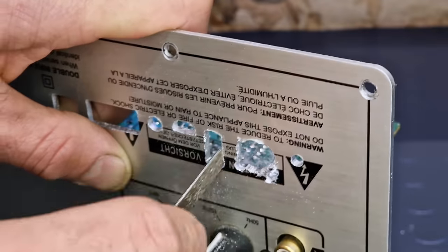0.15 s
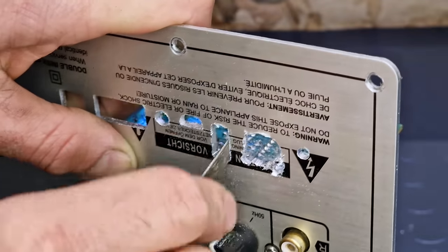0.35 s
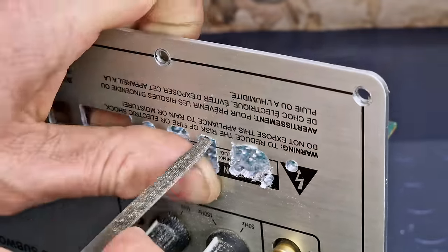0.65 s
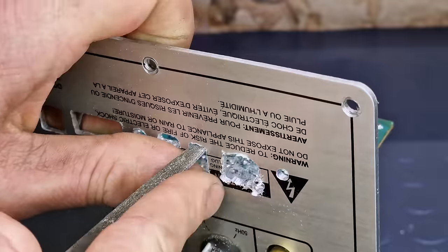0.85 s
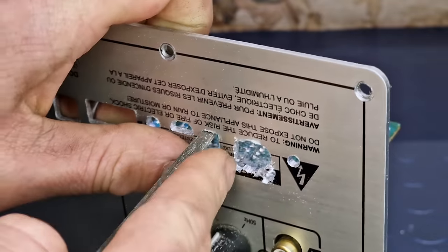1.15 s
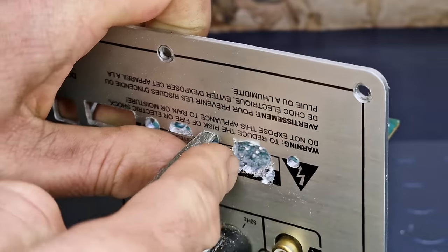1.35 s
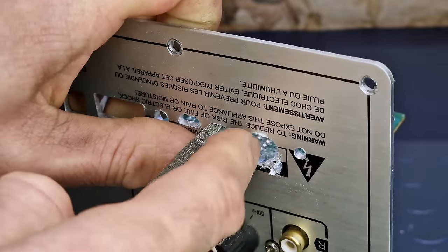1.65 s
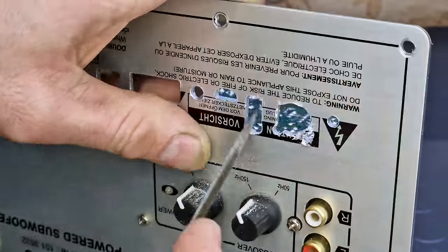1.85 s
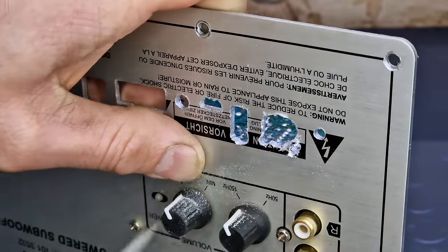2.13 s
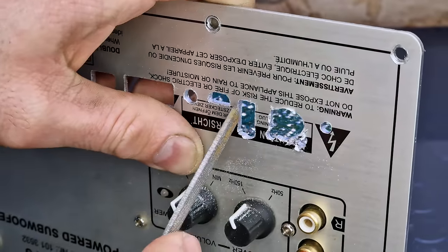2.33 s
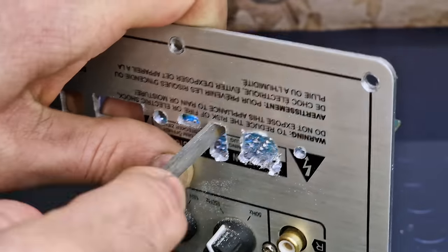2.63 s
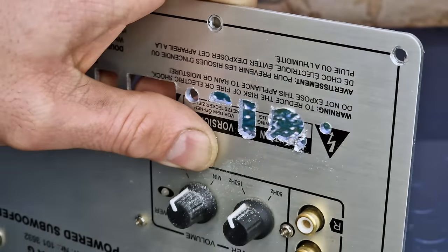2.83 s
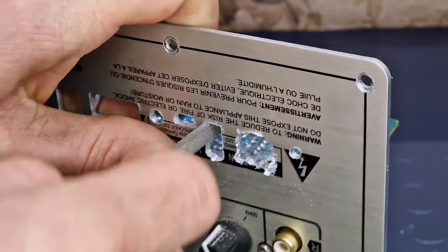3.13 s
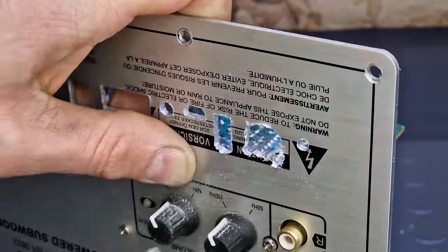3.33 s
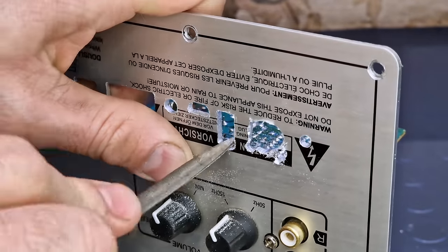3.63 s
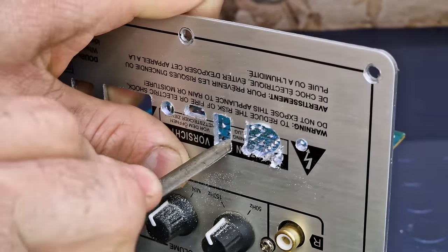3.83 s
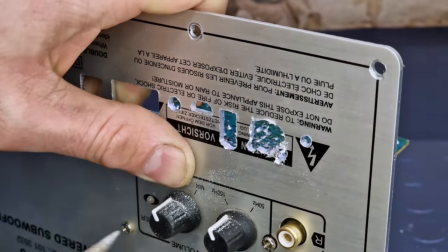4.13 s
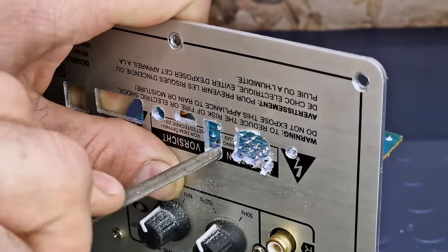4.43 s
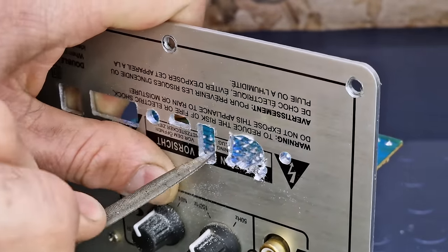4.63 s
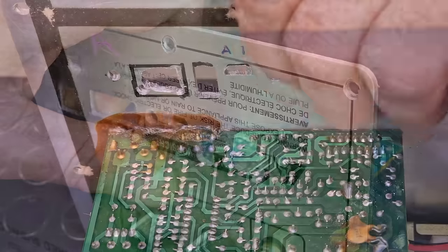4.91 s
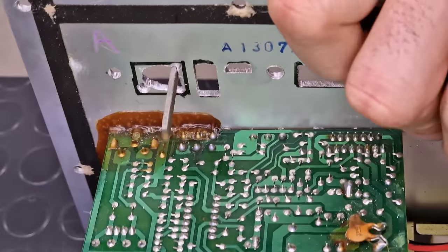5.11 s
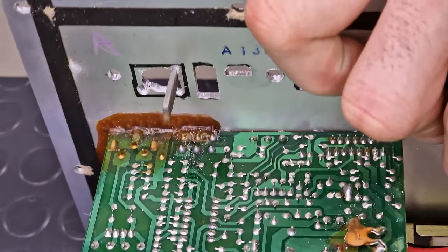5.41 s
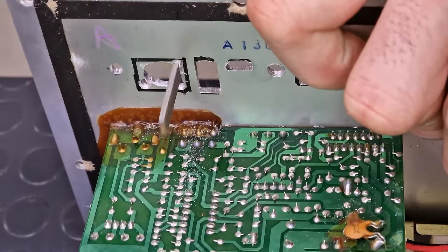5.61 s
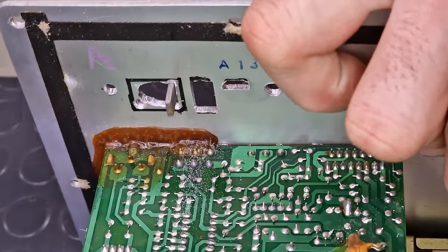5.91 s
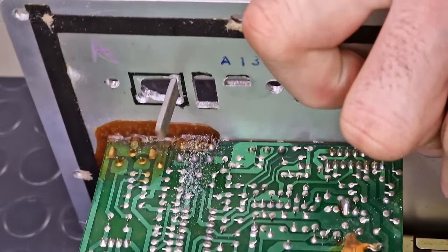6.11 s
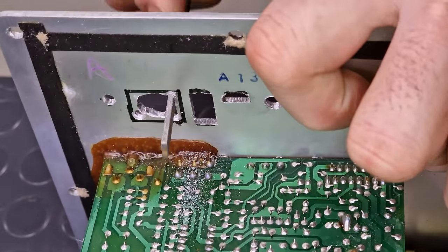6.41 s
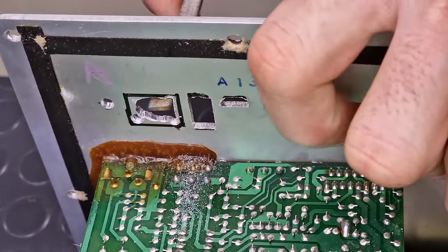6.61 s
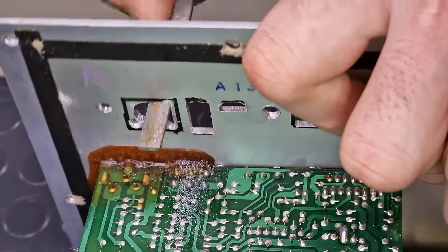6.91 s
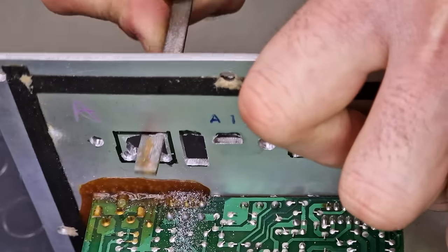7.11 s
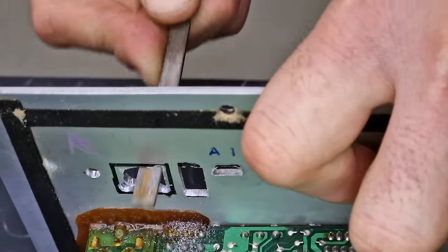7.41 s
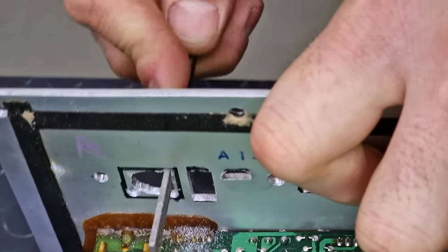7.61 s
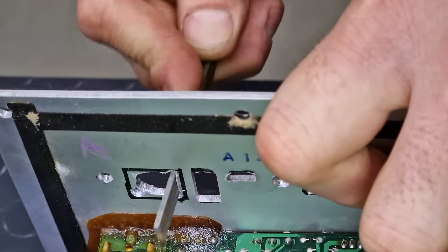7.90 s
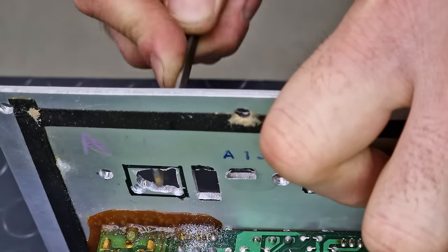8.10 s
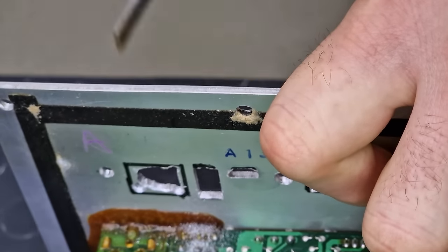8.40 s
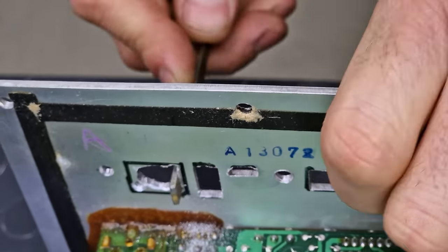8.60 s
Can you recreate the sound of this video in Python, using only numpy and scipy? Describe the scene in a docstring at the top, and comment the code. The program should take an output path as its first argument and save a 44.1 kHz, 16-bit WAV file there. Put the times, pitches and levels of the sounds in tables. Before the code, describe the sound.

A flat steel blade files a slot in an aluminium plate in short chattering strokes, with ticks, squeaks and later knocks, in a small workshop.

```python
"""A chattering rasp opens: a flat steel blade, cut like a file, works a slot in a hand-held aluminium plate.
In long strokes it bites about 30-80 times a second; tiny fractures hiss at the edge and ring the plate.
Between strokes it slides, scuffs and ticks. Now and then the edge squeaks or a hard push flexes the panel.
From 5 s it is heard from the back, where the panel rings louder and the blade knocks in the slot.
A small workshop adds short reflections and faint steady air."""
import sys
import numpy as np
from scipy import signal
from scipy.fft import rfft, irfft
from scipy.io import wavfile
from scipy.ndimage import uniform_filter1d, minimum_filter1d, map_coordinates

SR = 44100
rng = np.random.default_rng(int(sys.argv[2]) if len(sys.argv) > 2 else 0)


def master(y):
    """Save y as 16-bit WAV."""
    cut = np.clip(np.atleast_2d(y).T, -1, 1)
    pcm = np.round(cut * 32767)  # scale
    wavfile.write(sys.argv[1], SR, pcm.astype(np.int16))


N = 385875

# How the blade is held. Each row: start in seconds, grip name.
GRIPS = [(0, "upright"), (.6, "loose"), (1.9, "upright"), (2.22, "loose"), (2.43, "upright"),
         (3.42, "loose"), (3.62, "tipped"), (5, "edgewise"), (6.7, "flat")]
# Long strokes. Each row: start and end in seconds, bites per second at start, middle and end,
# then in relative dB: mid-stroke rasp, mid-stroke plate, pressure arch, pressure rise.
STROKES = [(.002, .447, 52.5, 67.5, 53.4, -37.5, -37.5, 1, 2),
           (1.278, 1.75, 27.55, 31.66, 36.6, -44, -37.5, 2, 1.5),
           (1.9615, 2.205, 44, 55.9, 53, -34.5, -35, 4.5, 4.5),
           (2.4866, 2.862, 57.3, 53.36, 67.3, -36, -36, 0.5, -2),
           (3.035, 3.393, 43.2, 79, 77.7, -36, -37.5, 0, -1.5),
           (3.6767, 3.96, 57.4, 66.7, 58.4, -43, -42, 1.5, 1),
           (3.956, 4.168, 68.4, 75.8, 81.5, -37.5, -38, 3, -0.5),
           (5.072, 5.31, 44.3, 50.3, 57, -34.5, -26.5, 10, 5.5),
           (5.309, 5.70, 65.2, 69.8, 71, -33.5, -32, 2, -1),
           (5.7355, 5.98, 49.4, 65.9, 76.5, -40, -36, 4, 2),
           (6.008, 6.385, 61, 66.9, 51.5, -34.5, -32, 3.5, 2),
           (6.389, 6.54, 61.3, 50, 39.8, -43, -36, 1.5, 4),
           (6.559, 6.65, 52.6, 61, 45, -38.5, -36.5, 7, -3),
           (6.7133, 7.014, 49, 61.9, 41.3, -34, -32, 5.5, 0.5),
           (7.05, 7.378, 61.1, 51.65, 39.6, -35, -33.5, 3.5, -2),
           (7.453, 7.56, 50, 69.2, 89, -40.5, -36, 4, 7),
           (7.607, 8.11, 71.3, 66.24, 76.4, -39, -34, -1, 1.5),
           (8.186, 8.46, 73.3, 70.4, 86, -36.5, -31, 4.5, 2)]
# Slides without pressure. Each row: start and length in seconds, rasp and plate in relative dB.
SLIDES = [(.503, 0.047, -44, -51), (.56, 0.16, -61.5, -53.5), (.95, 0.043, -66, -45),
          (1.135, 0.022, -69, -53), (1.81, 0.062, -52, -48), (1.905, 0.035, -64, -57),
          (2.26, 0.1, -45, -44), (2.445, .045, -49, -48), (3.02, .02, -51.5, -56),
          (3.478, .12, -53.5, -44.5), (4.275, 0.053, -62, -51.5), (4.38, 0.039, -47, -39),
          (4.535, 0.081, -50, -42), (4.95, 0.065, -66, -57), (5.02, 0.07, -53.5, -46.5),
          (5.70, 0.069, -43, -40), (5.975, 0.037, -47, -39), (6.65, 0.049, -53, -44.5),
          (7.014, 0.032, -57, -43), (8.172, .02, -52, -63), (8.635, 0.19, -49.5, -44.5)]
# Single scrapes. Each row: centre and nominal length in seconds, rasp and plate in relative dB.
SCUFFS = [(.523, 0.011, -33.5, -42), (.547, 0.0065, -31.5, -45), (.573, 0.0018, -36, -59),
          (.641, 0.003, -37, -35.5), (.742, 0.0083, -44.5, -36), (.764, 0.0064, -32.5, -30.5),
          (.809, 0.0031, -37.5, -31.5), (.948, 0.0029, -37, -29), (.984, 0.0028, -47, -37),
          (1.031, 0.0044, -31.5, -26), (1.086, 0.0018, -31, -33), (1.164, 0.0045, -30.5, -25.5),
          (1.218, 0.0034, -33.5, -28), (1.772, 0.015, -38.5, -42.5), (1.789, .0033, -34, -35),
          (1.83, 0.0033, -30.5, -28), (1.954, 0.0054, -39, -32), (2.259, 0.0013, -26.5, -21.5),
          (2.283, .0017, -27, -33), (2.408, 0.00096, -34.5, -52), (3.466, .0012, -34.5, -42),
          (3.56, 0.0028, -48, -51), (3.641, 0.004, -42, -43.5), (4.272, 0.0033, -47, -45),
          (4.377, 0.003, -39, -34), (4.472, 0.0077, -36.5, -39.5), (4.543, 0.0037, -33, -30.5),
          (4.598, .008, -34, -36), (4.625, .002, -41, -40), (4.76, 0.0087, -30.5, -33),
          (4.804, 0.0083, -35, -36.5), (4.844, 0.0028, -42, -40.5), (4.879, .0037, -26.5, -27.5),
          (4.931, 0.01, -38, -40), (8.516, .0015, -28.5, -34), (8.551, 0.00085, -28, -32.5),
          (8.588, 0.0029, -39.5, -39.5)]
# Edge squeaks and panel flexes. Each row: start in seconds, peak in relative dB, final pitch in Hz.
SQUEAKS = [(.762, -27, 4420), (1.681, -24, 4730), (1.768, -16.5, 3860), (1.828, -13.5, 1750),
           (1.833, -27.5, 4100), (4.045, -22.5, 4970), (4.097, -34, 5030), (4.147, -28, 4900),
           (7.346, -24, 4850)]
FLEXES = [(1.165, -36.5, 290), (4.546, -36, 287), (8.288, -32.5, 293), (8.39, -38, 287)]
# Strikes on the slot's end. Each row: start in seconds, peak in relative dB.
KNOCKS = [(5.1741, -16), (5.2149, -14), (5.245, -19), (5.2794, -16), (5.3413, -9), (5.3722, -18),
          (5.3998, -23.5), (5.6289, -20), (5.691, -14.5), (5.7215, -19), (5.7488, -23), (5.8365, -21.5),
          (6.027, -27), (6.129, -18), (6.2692, -11.5), (6.337, -19.5), (6.3574, -24), (6.5116, -19.5),
          (6.8893, -18.5), (6.9845, -15), (7.35, -8), (7.5383, -18), (7.6143, -19), (7.7036, -21),
          (7.874, -12), (8.0923, -22), (8.3928, -19.5), (8.516, -32.5)]

# Plate modes before hand damping. Each row: frequency in Hz, width in Hz, strength in relative dB.
PLATE_MODES = [(293, 11.7, 4.5), (379, 16, 2), (597.5, 9.3, 1), (750, 10.2, 17), (854.3, 20.8, 19),
               (930, 6.1, 5), (1088.4, 18, 4.5), (1139.5, 34, 7.5), (1394, 67, 12), (1501, 11.7, 8.5),
               (1823, 112, 6.5), (1994, 71, 3.5)]
# Broad plate responses. Each row: frequency in Hz, level in relative dB.
FRONT_PLATE_DB = [(30, -24.5), (200, -30), (280, -10), (430, -8), (560, 0), (800, -3), (1050, 2.5),
                  (1330, -8.5), (1550, -1), (2000, -6), (2650, -2.5), (3200, -12.5), (4200, -53.5)]
TIPPED_PLATE_DB = [(30, -24), (200, -23), (270, -5.5), (430, -2.5), (560, 3), (800, -6), (1050, 1.5),
                   (1330, -13.5), (1550, -2.5), (2200, -9.5), (2650, -2.5), (3200, -12.5), (4200, -38)]
BACK_PLATE_DB = [(30, -32), (210, -29), (290, -14.5), (400, -15.5), (480, -17), (580, -3), (680, -9.5),
                 (1080, -1), (1240, -8.5), (1400, -7.5), (1950, -10), (2350, -12), (2800, -18.5),
                 (4000, -20.5)]
KNOCK_PLATE_DB = [(100, -28), (500, -10), (1000, 0.5), (1450, -0.5), (2100, -6.5), (2700, -15),
                  (4000, -21.5), (12000, -29), (16000, -11)]
# Edge rasp spectra by grip. Each row: frequency in Hz, level in relative dB.
UPRIGHT_RASP_DB = [(1500, -10.5), (2800, -3.5), (3400, -8.5), (4200, -2.5), (5100, 2), (5700, -2),
                   (6400, -7.5), (8500, -6.5), (10500, -1.5), (12200, 3), (13300, -5), (14500, -1),
                   (15800, -17)]
LOOSE_RASP_DB = [(300, -57), (1500, -30), (2800, -2.5), (3500, -9), (4300, -6), (5200, 0.5), (6200, -9),
                 (8000, -9.5), (10000, -6.5), (12200, -3.5), (13500, -6), (15800, -13)]
TIPPED_RASP_DB = [(1500, -41), (2800, -23), (3500, -9), (4100, -3), (4800, 6), (5500, 5.5), (6100, -7),
                  (7500, -7), (9500, -4), (12100, 4.5), (13500, -3.5), (15800, -8.5)]
EDGEWISE_RASP_DB = [(1500, -53), (3000, -19), (4300, -13), (5300, -6.5), (5650, -2), (6100, -7.5),
                    (7200, -8), (8300, -15), (9800, -2.5), (11000, 1), (12300, 1), (13200, -1), (14600, -7),
                    (15800, -15)]
FLAT_RASP_DB = [(1500, -62), (3000, -13), (4300, -3.5), (5100, 2), (5550, 6), (6100, 1), (7200, -0.5),
                (8300, -9), (9800, 1), (11000, 4), (12500, 5.5), (13300, -1), (14600, 4), (15800, -9.5)]
# Steel that radiates a squeak. Each row: frequency in Hz, level in relative dB.
STEEL_DB = [(100, -60), (900, -24), (1800, 0.5), (5000, 11.5), (8000, -12), (16000, -24)]
# Phase lead of the left channel. Each row: frequency in Hz, lead in radians.
FRONT_LEAD_RAD = [(3000, 0), (5700, .65), (8000, .4), (11000, 1.4), (12200, 1.8), (16000, 1.2)]
BACK_LEAD_RAD = [(3000, 0), (4500, -.1), (6500, -.55), (9600, -1.0), (12100, -1.8), (14000, -2.2),
                 (16000, -1.6)]
# Room tone spectrum. Each row: frequency in Hz, level in relative dB.
AIR_DB = [(15, -32), (25, -25), (108, -16), (145, -13.5), (190, -10), (309, -13), (476, -9), (641, -11),
          (796, -6.5), (1190, -17), (2220, -12.5), (2410, -13.5), (3520, -23), (14400, -26), (16000, -67)]
# Room decay. Each row: frequency in Hz, time to fall 60 dB in seconds.
ROOM_T60_S = [(200, 0.48), (1000, 0.087), (4000, .14), (14000, 0.072)]


def amp(db):
    """Decibels to gain."""
    return 10 ** (np.asarray(db) / 20)


def unit_rms(x):
    """Scale to rms 1."""
    return x / np.sqrt(np.mean(np.abs(x) ** 2) + 1e-20)


def along(points, hz):
    """Interpolate (Hz, value) points on a log axis."""
    knots_hz, values = np.transpose(points)
    return np.interp(np.log(hz + 1), np.log(knots_hz), values)


def wobble(rate_hz):
    """Smooth random curve, rate_hz knots a second."""
    knots = rng.standard_normal(int(N * rate_hz / SR) + 4)
    return map_coordinates(knots, [np.arange(N) * rate_hz / SR])


def filtered(x, response, taps=16384):
    """Apply a complex frequency response."""
    lead = taps // 16
    impulse = np.roll(irfft(response(np.fft.rfftfreq(taps, 1 / SR))), lead, axis=-1)
    out = signal.oaconvolve(np.atleast_2d(x), np.atleast_2d(impulse), axes=1)
    return out[:, lead:lead + x.shape[-1]].squeeze()


def equalised(x, curve_db):
    """Apply a zero-phase (Hz, dB) curve."""
    return filtered(x, lambda hz: amp(along(curve_db, hz)))


def body(spectrum_db, modes=()):
    """Causal unit-power response: broad colour with ringing modes on top."""
    def response(hz):
        cepstrum = irfft(np.log(amp(along(spectrum_db, hz))))
        cepstrum[len(cepstrum) // 2:] = 0  # minimum phase
        ring = 1 + sum(amp(db) * 1j * hz * width_hz / (mode_hz ** 2 - hz ** 2 + 1j * hz * width_hz)
                       for mode_hz, width_hz, db in modes)
        return unit_rms(np.exp(2 * rfft(cepstrum)) * ring)
    return response


def held(rows, grip):
    """Events whose time falls within this grip."""
    grip_at = lambda time_s: [name for start_s, name in GRIPS if start_s <= time_s][-1]
    return [row for row in rows if grip_at(row[0]) == grip]


def contact(start_s, end_s, fade_s=0.0055):
    """Blade settles and lifts: sample indices, progress 0 to 1, soft gate."""
    span = np.arange(max(round((start_s - fade_s / 2) * SR), 0), min(round((end_s + fade_s / 2) * SR), N))
    t = span / SR
    gate = np.clip(np.minimum(t - start_s, end_s - t) / fade_s + .5, 0, 1)
    return span, (t - start_s) / (end_s - start_s), gate


def room_tone(level_db=-64.5):
    """Faint steady air with a narrow whirr; the rumble differs left to right."""
    mid, side = filtered(rng.standard_normal((2, N)), body(AIR_DB, modes=[(2590, 220, 8)]))
    side = equalised(side, [(40, 0), (120, 1), (400, -14), (3000, -2.5)])
    return amp(level_db) * (mid + np.array([side, -side]))


def chatter(grip, bite_s, scatter_db, drag_db, plate_drag_db, jitter_s=0.00082, push_db=2.5):
    """Force on edge and plate: the blade bounces, bites briefly and drags between bites."""
    force = np.zeros((2, N))
    for start_s, end_s, first_hz, mid_hz, last_hz, *levels_db in held(STROKES, grip):
        rasp_db, plate_db, arch_db, rise_db = levels_db
        span, progress, gate = contact(start_s, end_s)
        off_centre = 2 * progress - 1  # hand speed and pressure arch over the stroke
        slope_hz, bend_hz = (last_hz - first_hz) / 2, (first_hz + last_hz) / 2 - mid_hz
        rate_hz = np.abs(mid_hz + slope_hz * off_centre + bend_hz * off_centre ** 2)
        pressure = gate * amp(rise_db * off_centre / 2 - arch_db * off_centre ** 2)
        cycles = np.cumsum(rate_hz * (progress > 0)) / SR
        per_bite = np.clip(rng.standard_normal((64, 4)), -1.6, 1.6)
        shift, width, size, push = per_bite[cycles.astype(int)].T
        from_bite_s = (cycles % 1 - .5) / rate_hz + jitter_s * shift
        half_width_s = bite_s * np.exp(0.12 * width)
        bites = np.exp(-np.abs(from_bite_s / half_width_s) ** 3.05) * amp(scatter_db * size)
        edge_force = unit_rms(bites + amp(drag_db))
        plate_force = unit_rms(bites * amp(push_db * push) + amp(plate_drag_db))
        force[0, span] += pressure * amp(rasp_db) * edge_force
        force[1, span] += pressure * amp(plate_db) * plate_force
    return force


def shifting_noise(depth_db, patch_bins):
    """Noise whose colour shifts in patches, favouring different resonances in turn."""
    spectra = signal.stft(rng.standard_normal(N), nperseg=512)[2]
    patches = uniform_filter1d(rng.standard_normal(spectra.shape), size=patch_bins, axis=0)
    patches = unit_rms(uniform_filter1d(patches, size=4, axis=1))
    return unit_rms(signal.istft(spectra * amp(depth_db * patches), nperseg=512)[1][:N])


def fractures(grit_db=3.5):
    """Tiny fractures of the metal: gritty excitation for edge (stereo) and plate."""
    grit = unit_rms(amp(grit_db * wobble(rate_hz=2200)))
    facets = .5 * rng.standard_normal((2, N))  # each side hears partly different facets
    edge = unit_rms(shifting_noise(depth_db=2.8, patch_bins=20) + facets)
    plate = shifting_noise(depth_db=2.5, patch_bins=4)
    return grit * edge, grit * plate


def held_plate(spectrum_db, ring_db, min_width_hz=22):
    """Plate response; the holding hand damps the narrowest modes."""
    modes = [(hz, max(width_hz, min_width_hz), db + ring_db) for hz, width_hz, db in PLATE_MODES]
    return body(spectrum_db, modes)


def friction(force, grit, rasp, plate, lead_rad, rasp_db, plate_db, pan_db, ring_db):
    """Fractures, scaled by force, hiss at the edge and ring the plate."""
    highpass = lambda hz: (1j * hz / (1j * hz + 700)) ** 2  # a small edge radiates no bass
    hiss = filtered(force[0] * grit[0], lambda hz: body(rasp)(hz) * highpass(hz))
    ring = filtered(force[1] * grit[1], held_plate(plate, ring_db))
    sides = np.array([[.5], [-.5]])
    phase_shift = lambda hz: np.exp(1j * sides * along(lead_rad, hz))
    return amp(pan_db * sides) * filtered(amp(rasp_db) * hiss + amp(plate_db) * ring, phase_shift)


def slides(grip, uneven_db=3, fade_db=9):
    """Weak, uneven force of the blade sliding without biting, fading as it slows."""
    force = np.zeros((2, N))
    for start_s, length_s, *levels_db in held(SLIDES, grip):
        span, progress, gate = contact(start_s, start_s + length_s)
        force[:, span] += amp(levels_db)[:, None] * gate * amp(-fade_db * progress)
    return force * amp(uneven_db * wobble(rate_hz=110))


def scuffs(grip, skip_s=0.0158, skip_db=-12.5, tail_s=0.0069, tail_db=-15):
    """Force of single scrapes: one bite, one weak skip, a tail as the blade lifts."""
    force = np.zeros((2, N))
    for centre_s, length_s, *levels_db in held(SCUFFS, grip):
        span = np.arange(round((centre_s - .03) * SR), round((centre_s + .06) * SR))
        t = span / SR - centre_s
        bite = lambda at_s: np.exp(-((t - at_s) / (0.68 * length_s)) ** 2)
        skip = amp(skip_db) * bite(skip_s * np.exp(0.28 * rng.standard_normal()))
        tail = (t > 0) * amp(tail_db) * np.exp(-np.abs(t) / tail_s)
        force[:, span] += amp(levels_db)[:, None] * np.maximum(bite(0) + skip, tail)
    return force


def shudders(rows, colour, rise_s, glide, noise, gain_db, detune=0):
    """The blade catches: brief noisy vibrations, pitch sagging as it lets go."""
    out, t = np.zeros(N + SR), np.arange(SR // 6) / SR
    for start_s, peak_db, final_hz in rows:
        sag = 1 + glide * np.exp(-t / (2 * rise_s))
        pitch_hz = final_hz * np.exp(detune * rng.standard_normal()) * sag
        vibration = np.sin(2 * np.pi * np.cumsum(pitch_hz) / SR) + noise * rng.standard_normal(len(t))
        hit = filtered(vibration * t * np.exp(-t / rise_s), colour)
        out[round(start_s * SR):][:len(t)] += amp(peak_db + gain_db) * hit / np.abs(hit).max()
    return out[:N]


def squeaks():
    """The edge catches and squeaks through the steel."""
    return shudders(SQUEAKS, body(STEEL_DB), rise_s=.0024, glide=0.08, noise=0.96, gain_db=-1.5)


def flexes():
    """A hard push bends the whole panel, which hums briefly at its lowest mode."""
    panel = body([(100, -17), (280, -3), (410, 6), (900, -48)])
    return shudders(FLEXES, panel, rise_s=0.0064, glide=0.05, noise=3.1, gain_db=-1.5)


def knocks(chirp_hz=1220, thud_hz=55):
    """The blade strikes the slot's end: falling chirp in the panel, faint thud in the hand."""
    pitched = lambda hz: [(start_s, peak_db, hz) for start_s, peak_db in KNOCKS]
    panel = held_plate(KNOCK_PLATE_DB, ring_db=-5)
    hand = body([(30, 10), (150, 10), (400, -34), (2000, -70)])
    chirp = shudders(pitched(chirp_hz), panel, rise_s=0.0016, glide=0.8, noise=1.43,
                     gain_db=4, detune=0.096)
    thud = shudders(pitched(thud_hz), hand, rise_s=0.0071, glide=0.78, noise=27, gain_db=-52)
    return chirp + thud


def workshop(x, early_db=-17, tail_db=-17, early_s=.0012, build_s=0.0043):
    """Quick reflections off hands and bench scatter the treble; a short room tail follows."""
    hz, frame_s, spectra = signal.stft(rng.standard_normal((2, SR // 3)), SR, nperseg=256)
    decay = amp(-60 * frame_s / along(ROOM_T60_S, hz)[:, None])
    tail = signal.istft(spectra * decay, SR, nperseg=256)[1]
    tail = equalised(tail / np.linalg.norm(tail[0]), [(1500, 1.5), (6000, 2.5), (14000, 1.6)])
    t = np.arange(tail.shape[1]) / SR
    early = rng.standard_normal(tail.shape) * t * np.exp(-t / early_s)
    early = equalised(early / np.linalg.norm(early[0]), [(1000, -9), (3000, 0), (10000, 3)])
    impulse = amp(early_db) * early + amp(tail_db) * tail * np.minimum(t / build_s, 1)
    return x + signal.fftconvolve(x, impulse, axes=1)[:, :N]


def scene():
    """Five grips: upright, loose and tipped from the front, edgewise and flat from the back."""
    force = lambda grip, **bite: scuffs(grip) + slides(grip) + chatter(grip, **bite)
    upright = force("upright", bite_s=0.0048, scatter_db=1.7, drag_db=-18, plate_drag_db=-2.5)
    loose = force("loose", bite_s=0.0055, scatter_db=3.5, drag_db=-19.5, plate_drag_db=-12.5)
    tipped = force("tipped", bite_s=0.0033, scatter_db=1.2, drag_db=-21, plate_drag_db=-6)
    edgewise = force("edgewise", bite_s=0.0047, scatter_db=4, drag_db=-18, plate_drag_db=1.5)
    flat = force("flat", bite_s=0.0041, scatter_db=2.5, drag_db=-16.5, plate_drag_db=4)
    grit = fractures()
    metal = friction(upright, grit, UPRIGHT_RASP_DB, FRONT_PLATE_DB, FRONT_LEAD_RAD,
                     rasp_db=2.5, plate_db=-0.96, pan_db=1.2, ring_db=-6)
    metal += friction(loose, grit, LOOSE_RASP_DB, FRONT_PLATE_DB, FRONT_LEAD_RAD,
                      rasp_db=2.3, plate_db=-1, pan_db=1.6, ring_db=-5.5)
    metal += friction(tipped, grit, TIPPED_RASP_DB, TIPPED_PLATE_DB, FRONT_LEAD_RAD,
                      rasp_db=0.65, plate_db=-0.7, pan_db=1.9, ring_db=-5)
    metal += friction(edgewise, grit, EDGEWISE_RASP_DB, BACK_PLATE_DB, BACK_LEAD_RAD,
                      rasp_db=2.5, plate_db=-0.8, pan_db=-.9, ring_db=0)
    metal += friction(flat, grit, FLAT_RASP_DB, BACK_PLATE_DB, BACK_LEAD_RAD,
                      rasp_db=2, plate_db=0.64, pan_db=-.9, ring_db=0.5)
    metal += knocks() + flexes() + squeaks()
    return workshop(metal) + room_tone()


def record(dry):
    """A limiter holds down the sharpest peaks; a steep low-pass follows."""
    ceiling, window_samples, cutoff_hz = .25, 180, 15750
    needed = np.minimum(1, ceiling / (np.abs(dry).max(axis=0) + 1e-9))
    gain = uniform_filter1d(minimum_filter1d(needed, window_samples), window_samples)
    return filtered(dry * gain, lambda hz: 1 / np.sqrt(1 + (hz / cutoff_hz) ** 160))


dry = scene()
out = record(dry)
master(out)
```